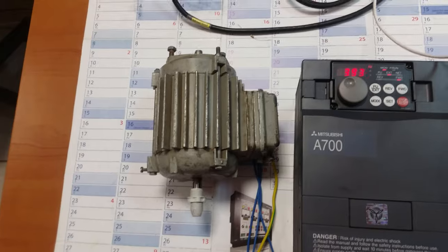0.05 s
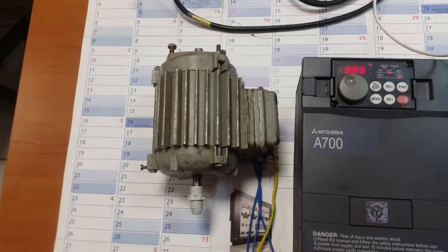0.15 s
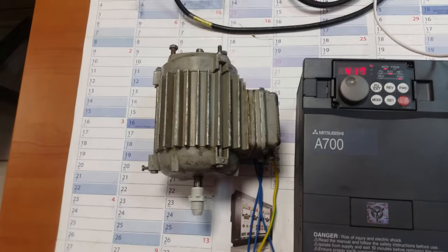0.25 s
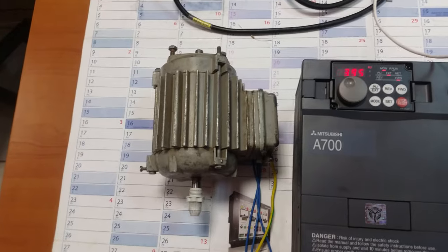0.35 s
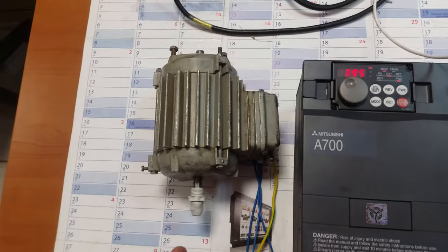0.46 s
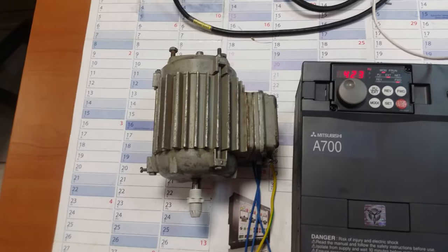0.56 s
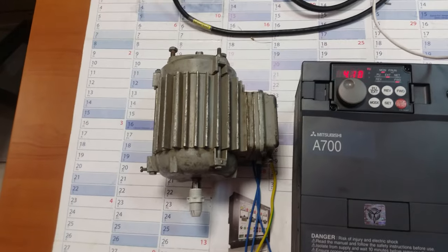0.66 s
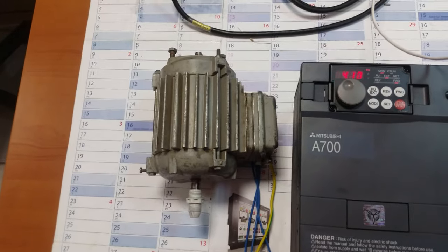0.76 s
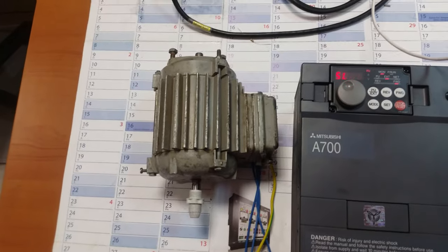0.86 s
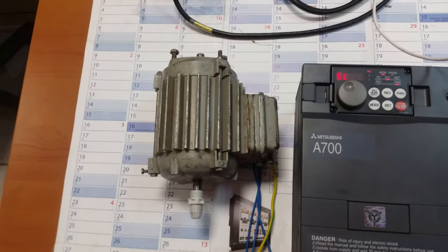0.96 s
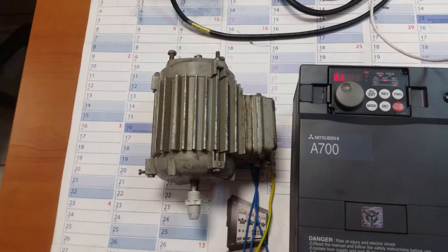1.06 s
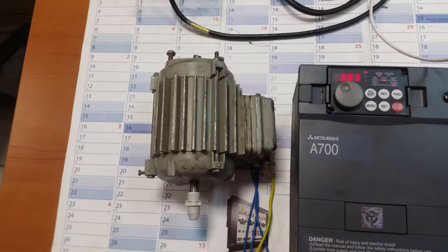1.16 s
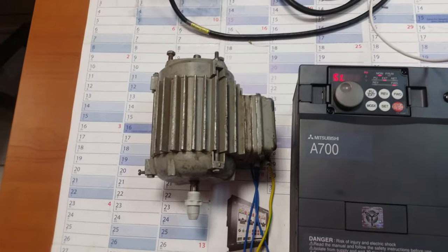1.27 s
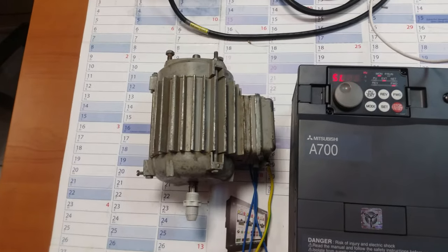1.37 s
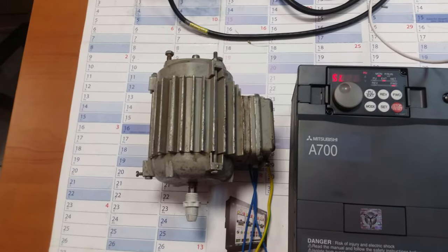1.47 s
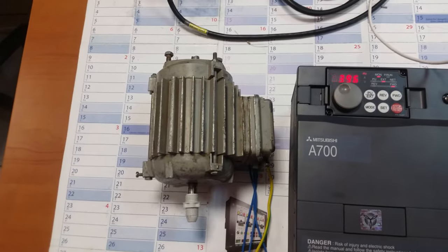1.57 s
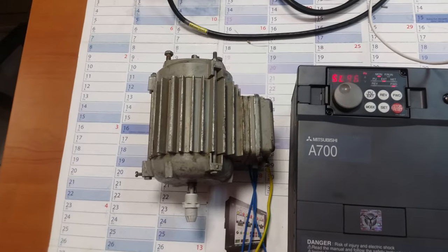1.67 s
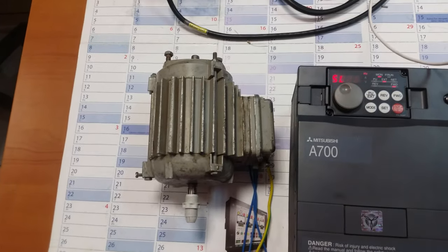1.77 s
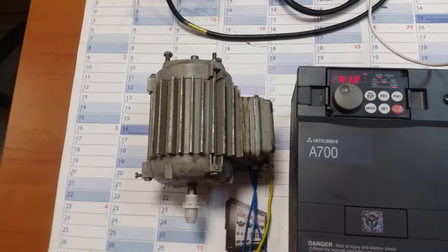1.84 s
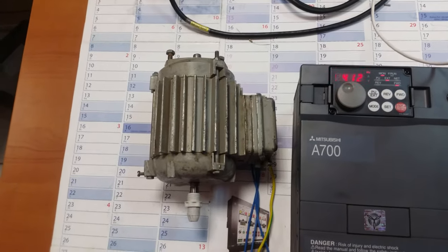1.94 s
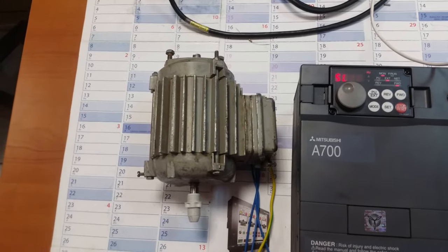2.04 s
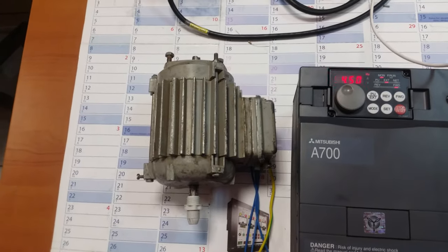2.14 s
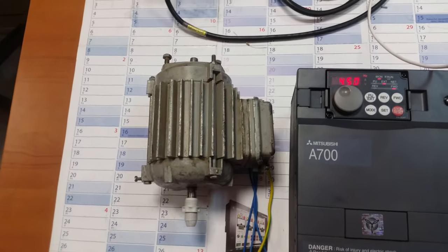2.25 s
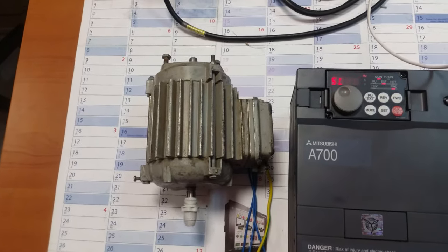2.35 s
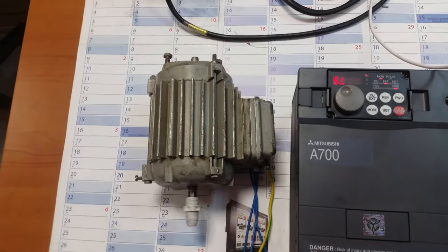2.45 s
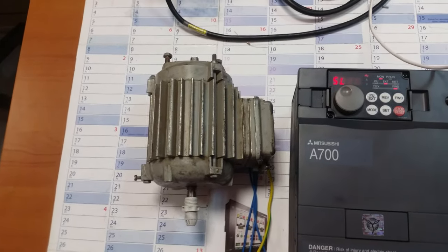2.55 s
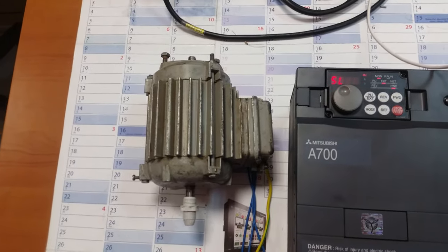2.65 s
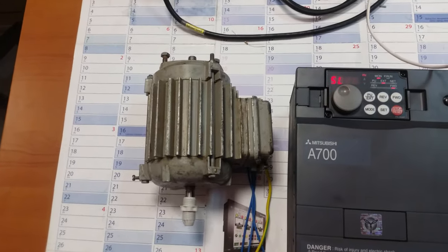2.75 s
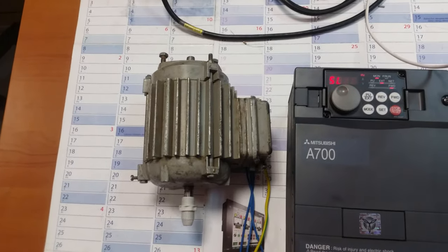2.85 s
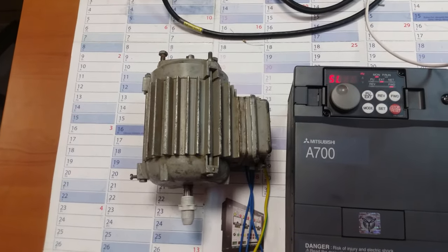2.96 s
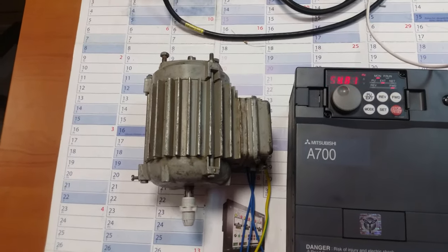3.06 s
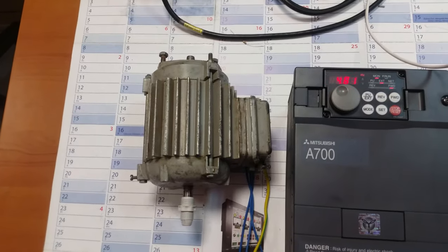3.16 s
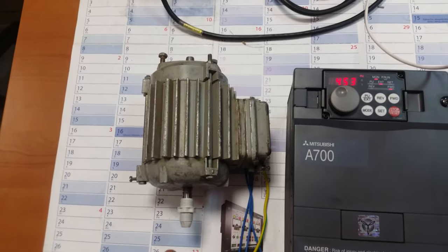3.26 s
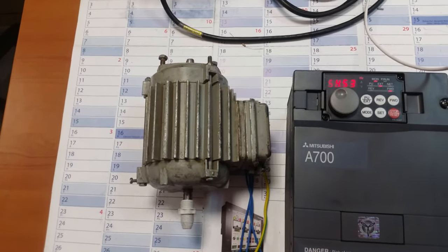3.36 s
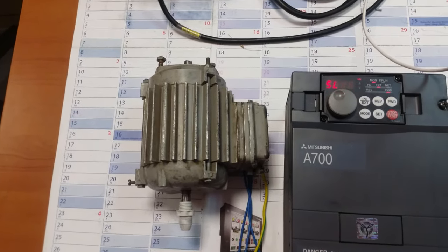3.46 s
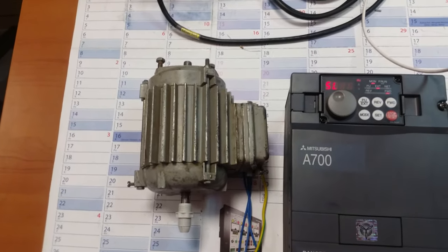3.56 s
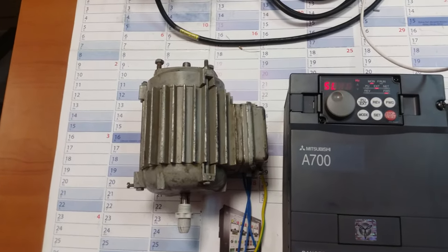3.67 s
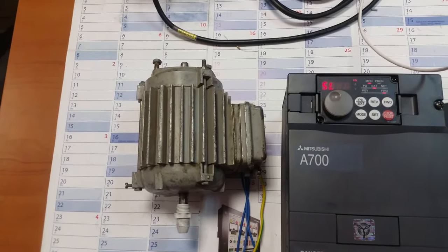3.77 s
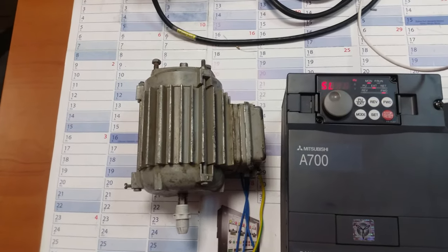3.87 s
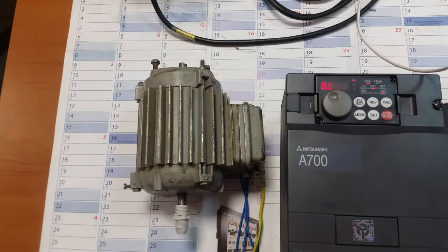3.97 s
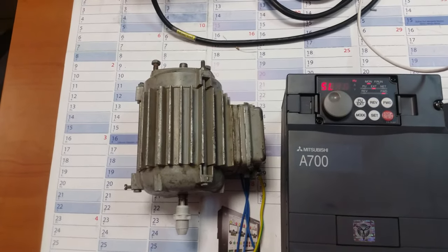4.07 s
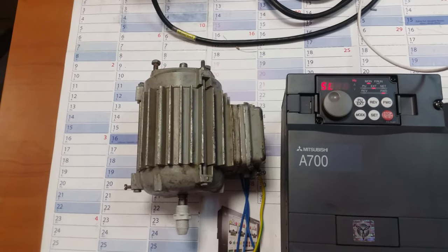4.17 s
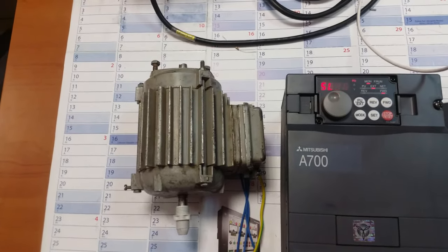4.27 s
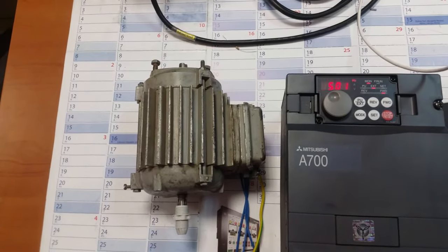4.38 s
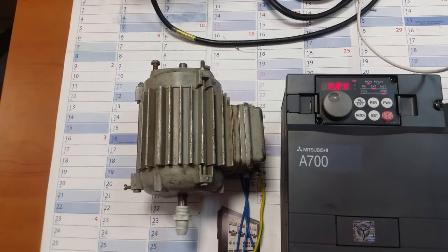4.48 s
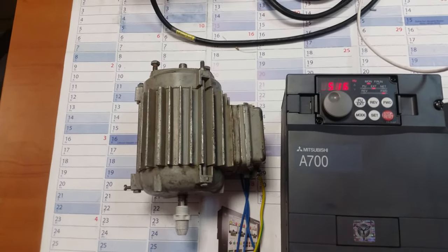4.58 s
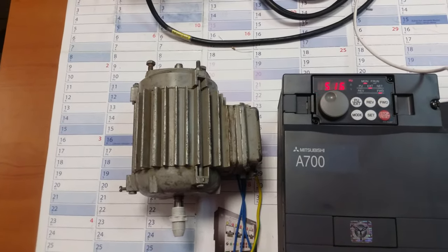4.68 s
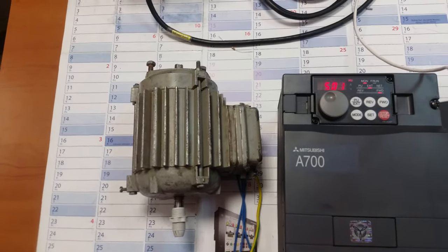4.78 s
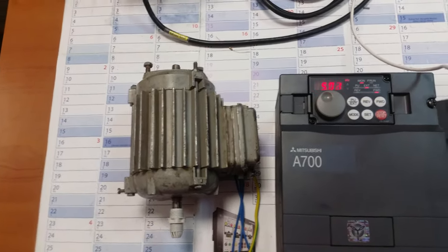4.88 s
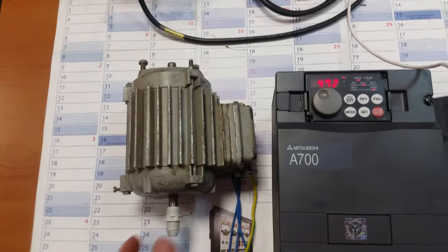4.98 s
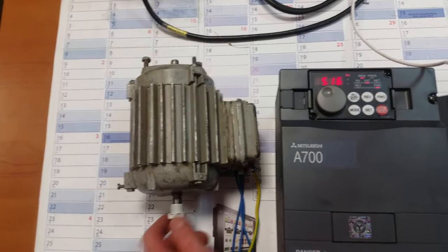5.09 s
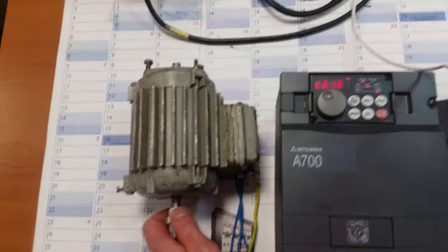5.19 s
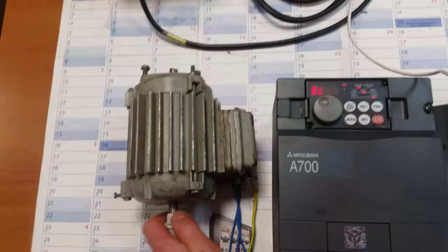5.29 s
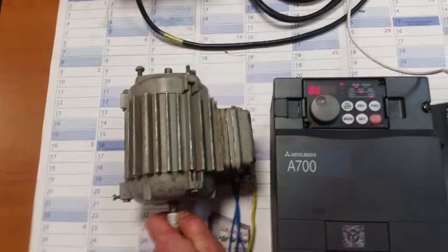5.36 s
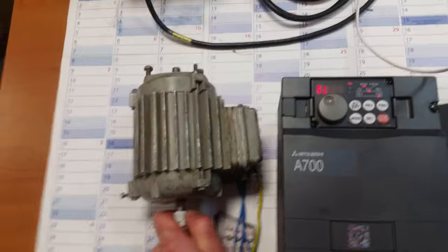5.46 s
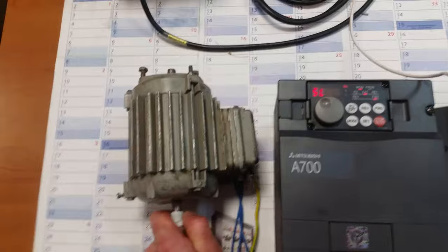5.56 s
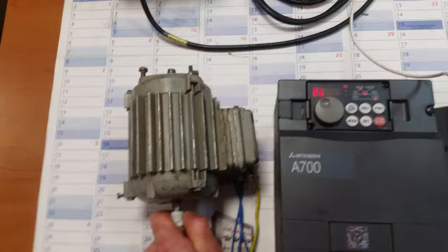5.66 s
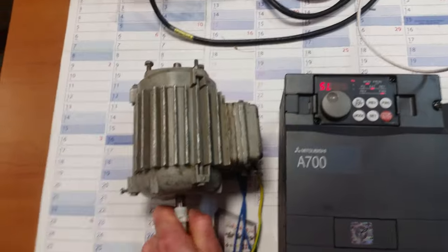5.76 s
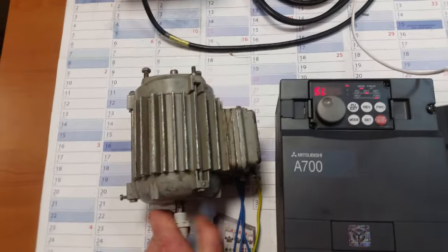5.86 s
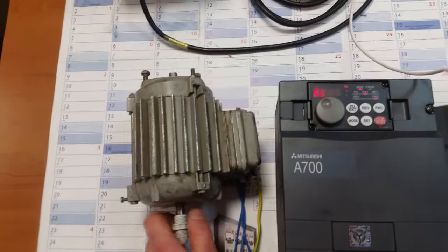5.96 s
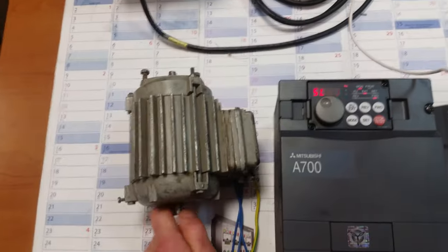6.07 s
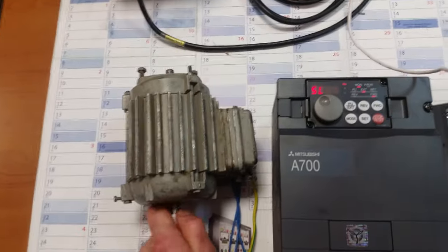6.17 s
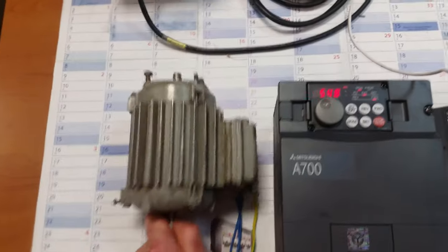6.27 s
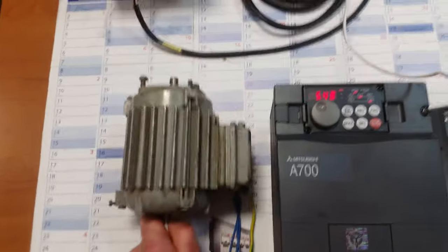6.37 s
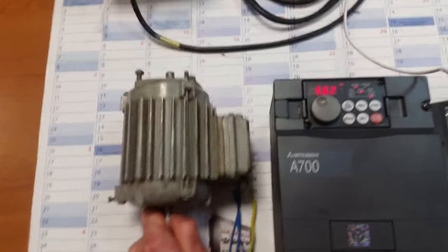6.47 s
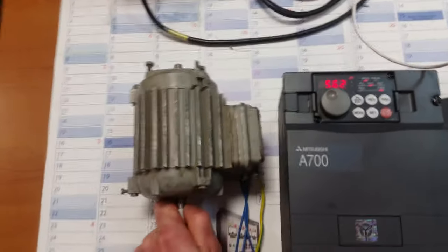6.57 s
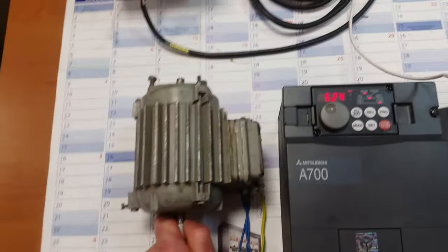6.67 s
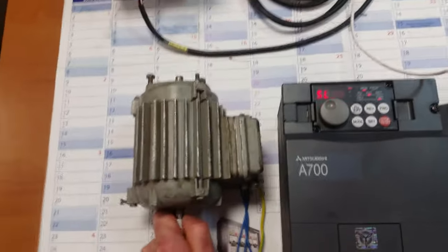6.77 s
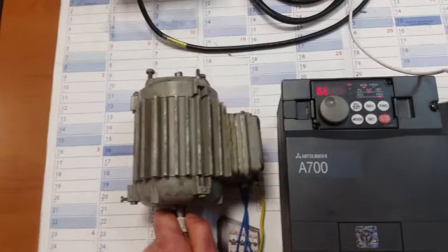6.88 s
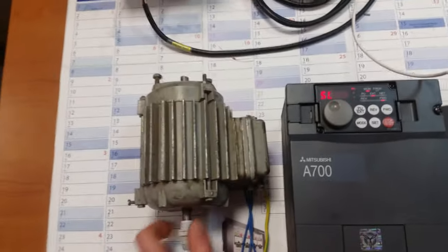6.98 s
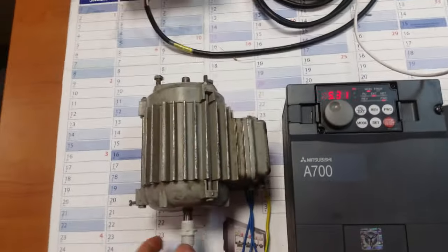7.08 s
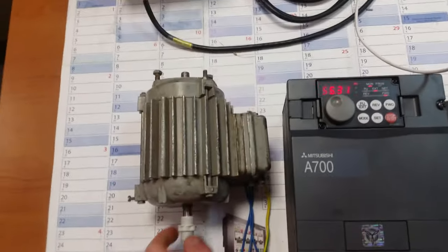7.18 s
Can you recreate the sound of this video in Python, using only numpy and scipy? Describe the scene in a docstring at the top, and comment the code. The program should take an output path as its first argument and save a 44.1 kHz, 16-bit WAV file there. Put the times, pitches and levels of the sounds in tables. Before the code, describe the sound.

Close up on an indoor desk, a small electric motor gives an unsteady, pulsing low hum with a buzzing, throbbing hiss and faint fan rush. The hum swells over the first few seconds. Around five seconds fingers knock and rub the spinning shaft with bright ticks and a rough metallic chatter; the background dips in level, then recovers. Near the end a low thump shakes the microphone and everything stops dead.

```python
"""An unsteady electric hum with a buzzing hiss comes first: a small inverter-fed induction motor on a desk.
Its shaking is made of wandering desk and frame resonances, its switched current of noise with a repeating pattern.
Near five seconds fingers knock and rub the shaft: ticks, ringing modes and grainy noise. The gain control ducks
this and recovers. A thump rings the body that holds the two-port microphone, a grip rustles, and the sound is cut."""
import sys
import numpy as np
from scipy import signal
from scipy.fft import rfft, irfft, next_fast_len
from scipy.io import wavfile
from scipy.ndimage import uniform_filter1d, minimum_filter1d

SR = 44100
rng = np.random.default_rng(int(sys.argv[2]) if len(sys.argv) > 2 else 0)


def boost_factor(decibels):
    """Convert a level in decibels to a linear amplitude factor."""
    exponent = np.asarray(decibels, float) / 20
    return 10 ** exponent


def generate_wav(signal):
    """Clip the signal to [-1, 1] and save it as 16-bit WAV at the path in sys.argv[1]."""
    frames = np.transpose(np.atleast_2d(signal))
    scaled = np.clip(frames, -1, 1) * 32767
    pcm = np.round(scaled).astype(np.int16)
    wavfile.write(sys.argv[1], SR, pcm)


N = 318843
SECONDS = np.arange(N) / SR
SIZE = next_fast_len(N)
HZ = np.arange(SIZE // 2 + 1) * SR / SIZE


def rms_one(x):
    """Scale to unit rms."""
    return x / np.sqrt(np.mean(x ** 2) + 1e-20)


def in_time(rows):
    """Columns of a curve, one value per sample."""
    s, *columns = np.transpose(rows)
    return [np.interp(SECONDS, s, column) for column in columns]


def at_hz(points):
    """A spectrum read on the frequency grid, joined along log frequency."""
    hz, value = np.transpose(points)
    return np.interp(np.log(HZ + 1), np.log(hz), value)


def humps(rows):
    """Bell-shaped swells, as gain."""
    return sum(boost_factor(db) * np.exp(-((SECONDS - s) / half_s) ** 2) for s, db, half_s in rows)


def resonances(rows):
    """Gain of resonances whose powers add."""
    power = 0
    for hz, width_hz, db in rows:
        detuning = (HZ ** 2 - hz ** 2) / (HZ + 1) / width_hz
        power = power + boost_factor(2 * db) / (1 + detuning ** 2)
    return np.sqrt(power)


def shaped(x, gain):
    """Colour a signal by a gain per frequency."""
    return irfft(rfft(x, SIZE) * gain, SIZE)[..., :N]


def flutter(hz, width_hz):
    """Slow chance movement around a rate; spread 1."""
    return rms_one(shaped(rng.standard_normal(N), 1 / (1 + ((HZ - hz) / width_hz) ** 2)))


def wavering_sine(hz, wander_hz, wander_width_hz):
    """A sine of rms 1 whose pitch wanders by chance."""
    pitch = hz + wander_hz * flutter(0, wander_width_hz)
    return np.sqrt(2) * np.sin(np.cumsum(2 * np.pi * pitch / SR))


def ring(clicks, modes):
    """Clicks set decaying sines ringing, each click with its own strength per mode."""
    out = 0
    at = np.flatnonzero(clicks)
    spread = boost_factor(1.0 * rng.standard_normal((len(at), len(modes))))
    for k, (hz, db, t60) in enumerate(modes):
        decay, turn = boost_factor(-60 / (t60 * SR)), 2 * np.pi * hz / SR
        blows = np.full(N, 1e-18)
        blows[at] = clicks[at] * spread[:, k]
        feedback = [1, -2 * decay * np.cos(turn), decay ** 2]
        out = out + signal.lfilter([0, boost_factor(db) * np.sin(turn)], feedback, blows)
    return out


LEFT_LAG_S = 0.0001   # the motor is nearer the right port
# how loud the left port is against the right: (f/Hz, level/dB)
PORTS = [(60, -0.1), (200, 1.4), (300, -0.5), (1170, 0.5), (1800, -4), (2740, -3.5), (3600, -12.5),
         (4800, -13.5), (5300, -36.5), (6400, -29.5), (7600, -25), (8800, -11), (9500, 1), (10500, -1.5),
         (13000, 0), (14500, -4.5), (15800, 0)]


def ports():
    """Gain of the left and right port: the left one is late and has its own balance of pitches."""
    ratio = boost_factor(at_hz(PORTS)) * np.exp(-2j * np.pi * HZ * LEFT_LAG_S)
    return np.array([ratio, np.ones_like(ratio)]) / np.sqrt((1 + np.abs(ratio) ** 2) / 2)


PORT_GAIN = ports()
# how alike left and right are: (f/Hz, likeness -1 to 1)
LIKENESS = [(40, .93), (70, 1), (110, 0.96), (200, 1), (380, 0.94), (700, 0.7), (1290, 0.91), (2380, 0.51),
            (4400, 0.08), (8120, -0.27), (15000, -0.02)]


def noise(gain):
    """Coloured stereo noise, alike in the bass and unrelated in the treble; mid rms 1 after the ports."""
    alike = np.clip(at_hz(LIKENESS), -1, 1)
    mid, side = rfft(rng.standard_normal((2, SIZE)))
    both = gain * (np.sqrt(1 + alike) * mid + np.sqrt(1 - alike) * side * [[1], [-1]])
    mid_power = np.sum(np.abs((both * PORT_GAIN).mean(axis=0)) ** 2)
    return irfft(both, SIZE)[:, :N] * SIZE / np.sqrt(2 * mid_power)


PULSE_HZ = 26.6   # the hum pulses unevenly at about this rate
PATTERN_HZ = 500   # the switching pattern repeats at this rate
# how the motor runs: (t/s, desk hum level/dB, frame rattle level/dB, switching hiss level/dB, load 0-1)
MOTOR = [(0.0, -26.5, -43.5, -36.5, 0.2), (0.6, -30, -43, -35.5, 0.04), (1.0, -31, -43, -35, 0.08),
         (1.25, -26.5, -39.5, -34.5, 0.23), (1.8, -30, -38, -34.5, 0.25), (2.3, -30, -37.5, -35.5, 0.41),
         (2.8, -26, -35.5, -36, 0.35), (3.3, -21, -35.5, -35.5, 0.44), (4.0, -21.5, -33.5, -35.5, 0.14),
         (4.9, -20.5, -33.5, -35, 0.42), (5.2, -24, -38.5, -39, 0.2), (5.33, -30.5, -33.5, -36.5, .3),
         (5.45, -25.5, -31, -35, 0.8), (5.55, -23.5, -33.5, -36.5, 0.77), (5.75, -23.5, -34.5, -35.5, 0.7),
         (5.88, -23.5, -35.5, -36, 0.56), (6.0, -19, -34, -35, 0.15), (6.14, -19, -33, -33.5, 0),
         (6.2, -23.5, -35, -34.5, 0), (6.32, -24, -37, -34.5, 0.3), (6.47, -28, -33.5, -34, 0.47),
         (6.6, -24, -36, -34.5, 0.6)]


def motor():
    """Unsteady magnetic pull shakes desk and frame; load sharpens the switching pattern into a comb of lines."""
    desk_db, frame_db, hiss_db, load = in_time(MOTOR)
    load = np.clip(load, 0, 1)
    pulse = np.tanh(flutter(PULSE_HZ, 12.0))
    # each repeat of the pattern keeps a share of the last one, less in the top treble
    kept = 0.68 / (1 + (HZ / 9500) ** 6)
    comb = 1 / (1 - kept * np.exp(-2j * np.pi * HZ / PATTERN_HZ))
    shaking = strongest_resonance(pulse) + desk(desk_db, pulse) + frame(frame_db, load, comb)
    current = switching_hiss(hiss_db, load, comb)
    return shaking + current + fan(load) + steady_tones() + whine() + low_rumble(desk_db)


CORE_HZ, CORE_DB, CORE_WAVER_DB = 292.2, -30.5, 2.5   # pitch; level between swells, and its waver
CORE_PULSE_DB = 2
CORE_GRIP_DB = 5.5   # a firm grip on the shaft takes this much off the level between swells
# firm grips: (start t/s, end t/s)
GRIPS = [(5.33, 6.1), (6.17, 7.3)]
# the resonance swells and sinks again: (t/s, peak level/dB, half-length/s)
SWELLS = [(0.08, -19.5, 0.014), (0.29, -26, 0.034), (0.64, -37, 0.062), (0.89, -38, 0.08),
          (1.22, -24, 0.068), (1.36, -18.5, 0.0099), (1.46, -19, 0.023), (1.72, -32, 0.19),
          (2.25, -39, 0.028), (2.82, -27, 0.03), (3.02, -33, 0.018), (3.44, -21, 0.054),
          (4.07, -28.5, 0.074), (5.22, -28, 0.1), (5.89, -19, 0.017), (6.09, -22, 0.066)]


def strongest_resonance(pulse):
    """The desk's strongest resonance rings on as a sine, its pitch wandering a little."""
    held = sum((SECONDS > start) * (SECONDS < end) * 1. for start, end in GRIPS)
    gripped = uniform_filter1d(held, size=800)
    between = boost_factor(CORE_DB + CORE_WAVER_DB * flutter(0, 6.6) - CORE_GRIP_DB * gripped)
    level = (between + humps(SWELLS)) * boost_factor(CORE_PULSE_DB * pulse)
    return level * wavering_sine(CORE_HZ, 4, 8.98)


DESK_PULSE_DB = 1
# other desk resonances, before sharpening: (f/Hz, width/Hz, level/dB)
DESK = [(250, 8.3, -17.5), (271, 25.8, 3), (321.5, 20, 3.5), (380, 64, -9), (435.7, 24, -3)]


def desk(desk_db, pulse):
    """The desk's other resonances colour noise into a wavering, pulsing hum."""
    level = boost_factor(desk_db + 0.97 * flutter(0, 4.2)) * boost_factor(DESK_PULSE_DB * pulse)
    return level * noise(resonances(DESK) ** 1.35 / (1 + (HZ / 700) ** 4))


# frame resonances: (f/Hz, width/Hz, level/dB)
FRAME = [(845, 140, -1), (885, 110, -1), (1041, 60, 0.5), (1232, 93, -0.5), (1330, 89, -5.5),
         (2075, 410, -11)]
# the frame's clearest mode, before sharpening: (f/Hz, width/Hz, level/dB)
FRAME_RING = (1017, 46, 0)
# level of that mode, before its waver: (t/s, level/dB)
RING_LEVEL = [(0, -58), (1.05, -56), (1.25, -44.5), (1.7, -42.5), (2.3, -38.5), (3.0, -38), (3.4, -44),
              (3.7, -45.5), (4.2, -38.5), (4.9, -45.5), (5.2, -45.5), (5.45, -39.5), (5.7, -39.5),
              (5.9, -37), (6.15, -44), (6.45, -35), (6.6, -35)]


def frame(frame_db, load, comb):
    """The frame's resonances rattle as noise, more patterned under load; one mode stands out."""
    body = resonances(FRAME) / (1 + (HZ / 3000) ** 4)
    rattle = np.sqrt(1 - load ** 2) * noise(body) + load * noise(body * comb)
    rattle = boost_factor(frame_db + 2.24 * flutter(25, 13.0)) * rattle
    clear_level = boost_factor(in_time(RING_LEVEL)[0] + 1.5 * flutter(0, 6.0))
    return rattle + clear_level * noise(resonances([FRAME_RING]) ** 1.9)


THROB_HZ = 34.1   # the hiss throbs at about this rate
# balance of the switching hiss: (f/Hz, level/dB)
HISS = [(820, -30.5), (1400, -1.5), (1860, -7), (2040, -11), (2580, -8.5), (3290, -9), (3600, -9.5),
        (4240, -7.5), (4740, -5.5), (6430, 2), (7120, -3.5), (10500, -30.5), (11800, -28.5), (13200, -27.5),
        (15900, -25)]
# casing resonances that the hiss excites: (f/Hz, width/Hz, level/dB over the hiss)
CASING = [(2060, 100, 8.5), (3676, 170, 5), (4760, 98, 6.5), (6240, 180, 4), (7100, 470, 5),
          (8860, 150, 5.5), (9760, 250, 0.5), (14700, 700, 1)]
# how far the treble above about 9200 Hz is raised: (t/s, level/dB)
TOP_TREBLE = [(0, 7.5), (.9, 4), (1.6, -0.5), (3, 2.5), (4.9, 2.5), (5.4, -3), (5.9, -6), (6.25, -0.5),
              (6.6, 0)]


def switching_hiss(hiss_db, load, comb):
    """Switched current hisses through the casing and throbs, deeper and more patterned under load."""
    colour = boost_factor(at_hz(HISS)) * np.hypot(1, resonances(CASING)) / (1 + (1100 / (HZ + 1)) ** 4)
    hiss = np.sqrt(1 - load) * noise(colour) + np.sqrt(load) * noise(colour * comb)
    throb_db = (2.0 + 1.2 * load) * np.tanh(flutter(THROB_HZ, 23.0))
    hiss = boost_factor(hiss_db + throb_db) * hiss
    top = shaped(hiss, 1 / (1 + (9200 / (HZ + 1)) ** 12))
    return hiss + top * (boost_factor(in_time(TOP_TREBLE)[0]) - 1)


# fingers knock the shaft: (t/s, blow level/dB, chatter level/dB, tick level/dB), levels relative
KNOCKS = [(4.947, -17, -35.5, -36.5), (4.995, 2, 8.5, -2.5), (5.0165, -7.5, -14, -32.5),
          (5.0484, -4.5, -1.5, -16), (5.083, -5, -13.5, -28), (5.2, -23, -37, -18.5), (5.28, -17, -33, -25),
          (5.368, -19, -16, -33), (5.3855, -8.5, -16, -9.5)]


def fingers():
    """Each knock is a bright tick, then a few milliseconds of contact ring the shaft; a rub follows."""
    s, blow_db, slip_db, tick_db = np.transpose(KNOCKS)
    at = (s * SR).astype(int)
    # skin is soft: the contact lasts long enough to dull the top
    skin = signal.butter(2, [400, 4200], "band", fs=SR, output="sos")
    return signal.sosfilt(skin, blows_and_slips(at, blow_db, slip_db) + rub()) + nail_ticks(at, tick_db)


LANDING_S = 0.00097   # from the knock's time to its blow
BLOW_DB, SLIP_DB = -15.5, -22   # added to the knock's own levels
SLIP_COUNT, CHATTER_HZ = 8, 1987   # slips per knock, and their rate
# shaft and casing modes: (f/Hz, level/dB, t60/s)
SHAFT = [(470, -7.5, 0.036), (684, -20.5, .025), (890, -14, 0.019), (1012, -22.5, 0.04), (1045, -1, 0.05),
         (1140, -2.5, 0.027), (1260, -5, 0.023), (1482, -5.5, 0.041), (1570, 3, 0.043), (1700, -1.5, 0.02),
         (1807, 4.5, 0.011), (2030, -1, 0.012), (2310, -0.5, 0.017), (2328, -0.5, 0.023),
         (2943, -10.5, 0.017), (3270, -13.5, .01), (3850, -20.5, 0.0071), (4590, -15, .012)]


def blows_and_slips(at, blow_db, slip_db):
    """A knock lands as one blow, then the skin chatters on the turning shaft in a short run of slips."""
    clicks = np.zeros(N)
    clicks[at + round(LANDING_S * SR)] = boost_factor(blow_db + BLOW_DB)
    for k in range(1, SLIP_COUNT + 1):
        swell = np.sin(np.pi * k / (SLIP_COUNT + 1))
        clicks[at + round((LANDING_S + k / CHATTER_HZ) * SR)] = boost_factor(slip_db + SLIP_DB) * swell
    return ring(clicks, SHAFT)


# modes of the nail's tick: (f/Hz, level/dB, t60/s)
NAIL = [(5160, -12.5, 0.008), (6510, 0, 0.01), (7260, -11, .008)]


def nail_ticks(at, tick_db):
    """A nail's click rings a few high modes, with a fizz of decaying noise around them."""
    ticks = np.zeros(N)
    ticks[at - round(0.0007 * SR)] = boost_factor(tick_db)
    burst = signal.lfilter([1], [1, -boost_factor(-60 / (0.013 * SR))], ticks + 1e-18)
    fizz_colour = resonances([(5800, 2600, 1)]) / (1 + (HZ / 7500) ** 5)
    fizz = shaped(burst * rng.standard_normal((2, N)), fizz_colour)
    return shaped(ring(ticks, NAIL), 1 / (1 + (HZ / 8200) ** 8)) + fizz


RUB_OWN = 0.9   # the part of the rub that differs between the ports, against the shared part
RUB_DAMPING = 2.3   # pressed skin widens the shaft's modes by this factor
# firm touches that die away: (t/s, level/dB, hold/s, fade/dB per s)
RUBS = [(4.9962, -12.5, 0.004, 700), (5.016, -19, 0.02, 499), (5.046, -20.5, 0.024, 180.5)]
# skin favours some of the shaft's ring: (f/Hz, width/Hz, level/dB)
RUB_COLOUR = [(690, 200, 18.5), (1150, 390, 10.5), (2000, 895, 4), (2720, 1000, 7.5)]


def rub():
    """Fingers rub the turning shaft: dense friction noise in the shaft's own modes, damped by skin."""
    grains = rng.standard_normal((3, N))
    grains = grains[0] + RUB_OWN * grains[1:]
    firm = 0
    for start, rub_db, hold_s, fade in RUBS:
        fading_s = np.maximum(SECONDS - start - hold_s, 0)
        firm = firm + (SECONDS > start) * boost_factor(rub_db - fade * fading_s)
    # a mode's width follows from its decay time
    damped = [(hz, RUB_DAMPING * np.log(1000) / np.pi / t60, db) for hz, db, t60 in SHAFT]
    return firm * rms_one(shaped(grains, resonances(RUB_COLOUR) * resonances(damped)))


THUMP_S, THUMP_DB = 6.5808, -5
REBOUND_S, REBOUND_DB = 6.5893, -16.5
CREAK_S, CREAK_DB = 6.592, -28.5   # start and level of the grip's rustle
# modes of the handled body: (f/Hz, level/dB, t60/s)
THUMP = [(114.9, -2, 0.2), (170.6, -7, 0.1), (248, 1.5, 0.052), (348.6, -5, 0.06), (432, -10, 0.074)]


def handling():
    """A short pull, a harder push and a rebound ring the microphone's body, then the grip rustles as noise."""
    push = np.zeros(N)
    push[round(THUMP_S * SR)] = -boost_factor(THUMP_DB - 6.5)
    push[round((THUMP_S + 0.0017) * SR)] = boost_factor(THUMP_DB)
    push[round(REBOUND_S * SR)] = boost_factor(REBOUND_DB)
    soft_touch = signal.butter(2, [70, 650], "band", fs=SR, output="sos")
    thump = signal.sosfilt(soft_touch, ring(push, THUMP))
    creak_colour = resonances([(700, 130, 0.5), (3380, 2200, -7.0)]) / (1 + (HZ / 6000) ** 4)
    creak = (SECONDS > CREAK_S) * noise(creak_colour)
    return thump + boost_factor(CREAK_DB) * creak


FAN_DB = -31.5   # level once swelled, without load
FAN_START_DB, FAN_RISE_S = 1, 1.4   # it starts this much quieter and swells
# resonances of the cooling fan's rush: (f/Hz, width/Hz, level/dB)
FAN = [(466.4, 49.5, -1.5), (539, 44, -5), (380, 74, -10.5), (694, 89, -19), (1520, 63, -21.5),
       (2247, 110, -19.5)]


def fan(load):
    """The fan sits on the shaft: a rush of resonant noise that quietens as the shaft is braked."""
    level_db = FAN_DB - 2.9 * load ** 2 - FAN_START_DB * np.exp(-SECONDS / FAN_RISE_S)
    return boost_factor(level_db) * noise(resonances(FAN) / (1 + (HZ / 2600) ** 8))


LINE_HZ, LINE_DB, LINE_WAVER_DB = 559.7, -40, 1.5   # one clean magnetic tone
# thin tones, before sharpening: (f/Hz, width/Hz, level/dB)
TONES = [(52, 20, -49), (565.6, 21, -45), (1293, 12, -54), (8140, 40, -62)]


def steady_tones():
    """Narrow bands of noise make thin tones beside one magnetic tone, a slightly wavering sine."""
    thin = sum(boost_factor(db) * noise(resonances([(hz, width_hz, 0)]) ** 2) for hz, width_hz, db in TONES)
    return thin + boost_factor(LINE_DB + LINE_WAVER_DB * flutter(0, 5.0)) * wavering_sine(LINE_HZ, 1.5, 2.93)


WHINE_DB, WHINE_RISE_DB_PER_S = -63, 0.7   # at the start, before the port offsets
WHINE_DROP_S, WHINE_LOW_DB, WHINE_BACK_S, WHINE_BACK_DB = 3.1, -69.5, 5.9, -62.5   # it drops, later returns
# a high carrier band, before sharpening: (f/Hz, width/Hz, level/dB)
WHINE = (11780, 340, 0)


def whine():
    """A narrow band of high noise at the carrier, mostly at the left port."""
    early_db = WHINE_DB + WHINE_RISE_DB_PER_S * SECONDS
    whine_db = np.select([SECONDS < WHINE_DROP_S, SECONDS < WHINE_BACK_S], [early_db, WHINE_LOW_DB], WHINE_BACK_DB)
    port_db = np.array([[1.5], [-10]])   # left, right
    return boost_factor(whine_db + port_db) * noise(resonances([WHINE]) ** 2)


LOW_DB, LOW_FOLLOWS, LOW_WAVER_DB = -42.5, 0.67, 1   # level at mean hum; share of the hum's swing; waver
# room and desk lows, before sharpening: (f/Hz, width/Hz, level/dB)
LOWS = [(85, 13, -2), (117.3, 4.8, 0.5), (171.7, 14, 4), (195, 24, -3.5)]
# the low rumble surges: (t/s, peak level/dB, half-length/s)
SURGES = [(0.84, -39, 0.036), (1.2, -43, 0.055), (2.15, -47, 0.063), (3.44, -46, 0.036), (5.08, -38, 0.045),
          (6.40, -30, 0.03), (6.48, -30.5, 0.032)]


def low_rumble(desk_db):
    """Room and desk lows rumble as noise that partly follows the hum and sometimes surges."""
    low_db = LOW_DB + LOW_FOLLOWS * (desk_db - desk_db.mean()) + LOW_WAVER_DB * flutter(0, 3.1)
    return (boost_factor(low_db) + humps(SURGES)) * noise(resonances(LOWS) ** 1.46 / (1 + (HZ / 300) ** 4))


def scene():
    """All sources at the microphone."""
    return motor() + fingers() + handling()


def gain_control(x, trip_db, duck_db, top_db, hold_s, ramp_s):
    """A loud treble burst trips the control: gain ramps down, holds and ramps back; meanwhile the sound above
    about 8900 Hz thins further."""
    hold, ramp = round(hold_s * SR), round(ramp_s * SR)
    treble = shaped(x.mean(axis=0), 1 / (1 + (1000 / (HZ + 1)) ** 4))
    treble_power = uniform_filter1d(treble ** 2, size=256, origin=127)
    tripped = (treble_power > boost_factor(2 * trip_db)) * 1.
    held = -minimum_filter1d(-tripped, hold, origin=(hold - 1) // 2, mode="constant")
    duck = uniform_filter1d(held, ramp, origin=(ramp - 1) // 2, mode="constant")
    top = shaped(x, 1 / (1 + (8900 / (HZ + 1)) ** 24))
    return boost_factor(duck_db * duck) * (x - top + top * boost_factor(top_db * duck))


def roll_off(x):
    """The treble ends steeply here."""
    return signal.sosfilt(signal.butter(12, 16300, fs=SR, output="sos"), x)


TOP_HZ, END_S = 15730, 6.6222   # nothing passes above this pitch; the sound is cut at this time


def record(dry):
    """Unequal ports, bass and top cuts, gain control, overload and the cut to silence."""
    x = shaped(dry, PORT_GAIN / (1 + (45 / (HZ + 1)) ** 3) * (HZ < TOP_HZ))
    x = gain_control(x, trip_db=-12, duck_db=-11.0, top_db=-7.5, hold_s=0.79, ramp_s=0.47)
    x = 1.15 * np.tanh(x / 1.15)   # soft overload
    x = x * (np.arange(N) < END_S * SR)
    return roll_off(x)


dry = scene()
out = record(dry)
generate_wav(out)
```